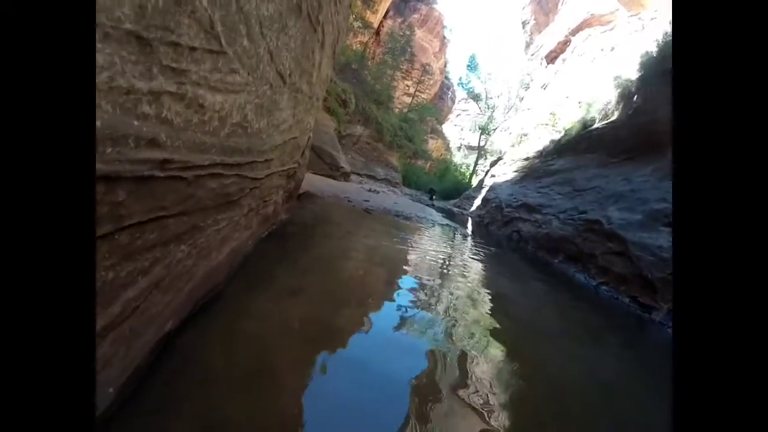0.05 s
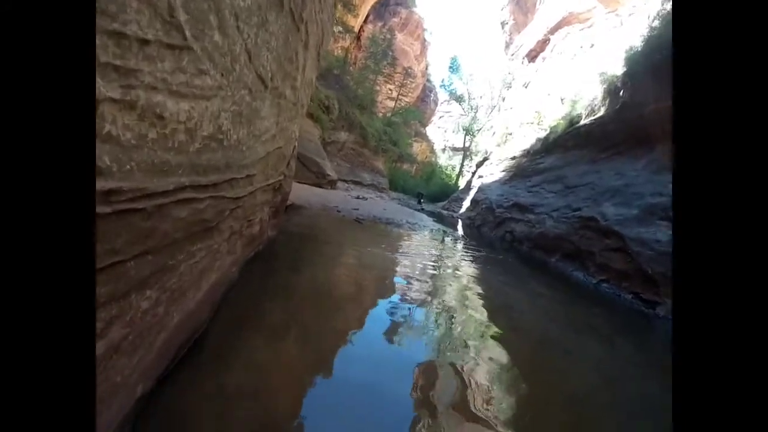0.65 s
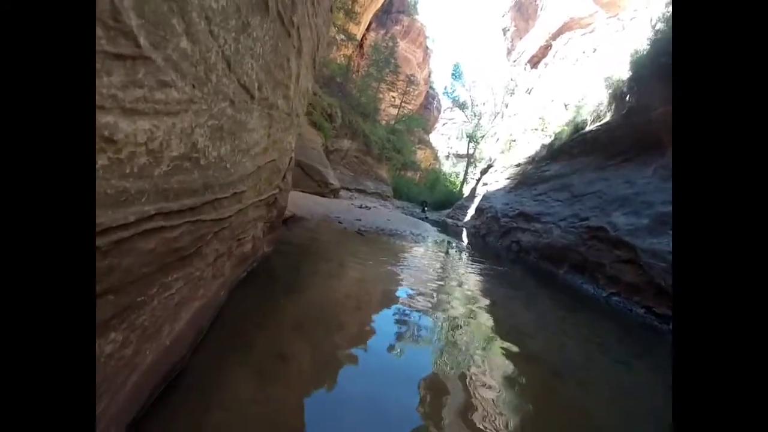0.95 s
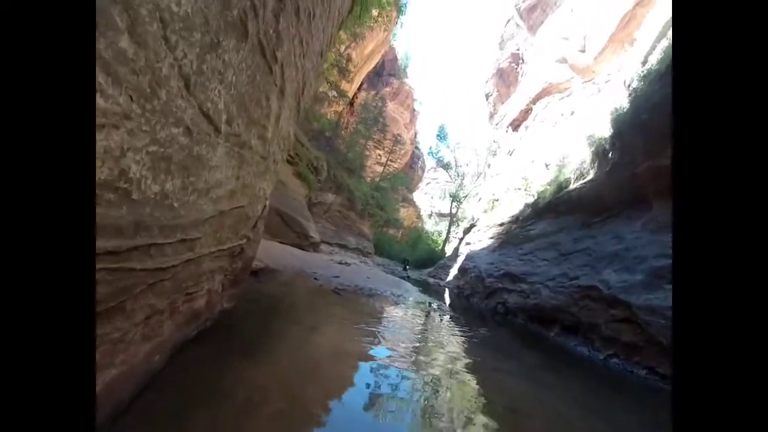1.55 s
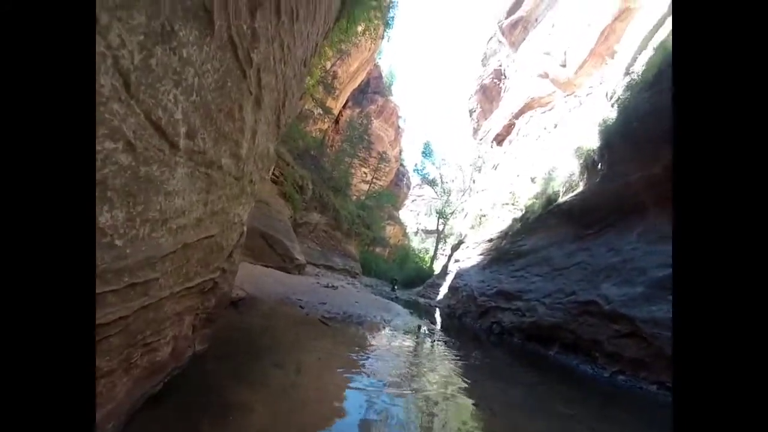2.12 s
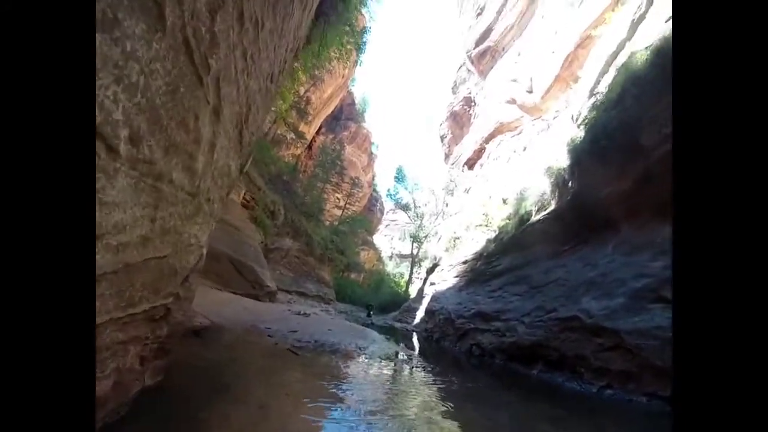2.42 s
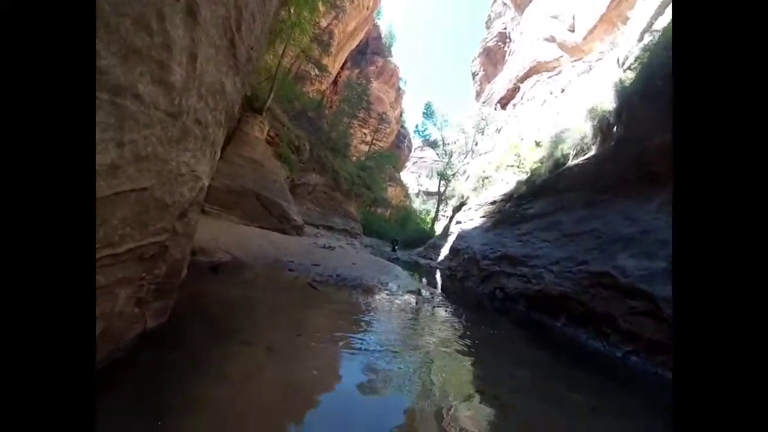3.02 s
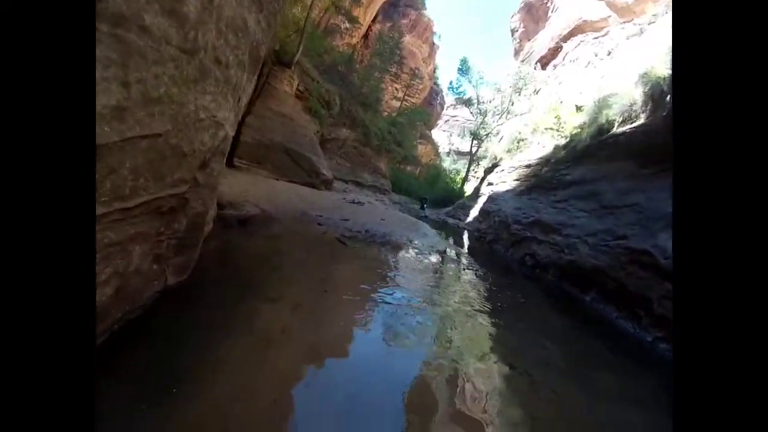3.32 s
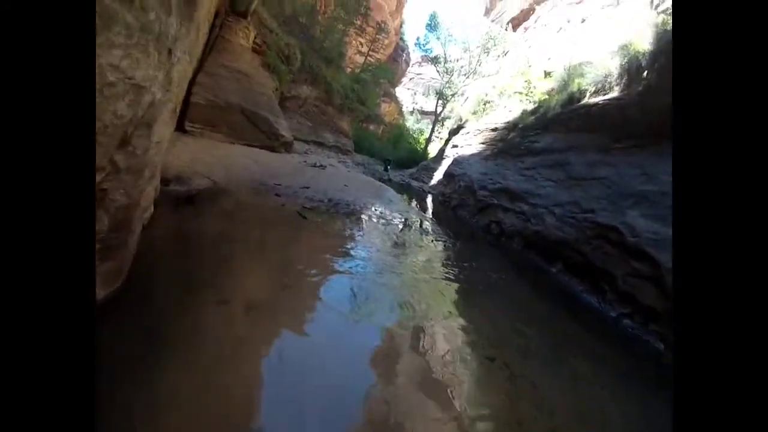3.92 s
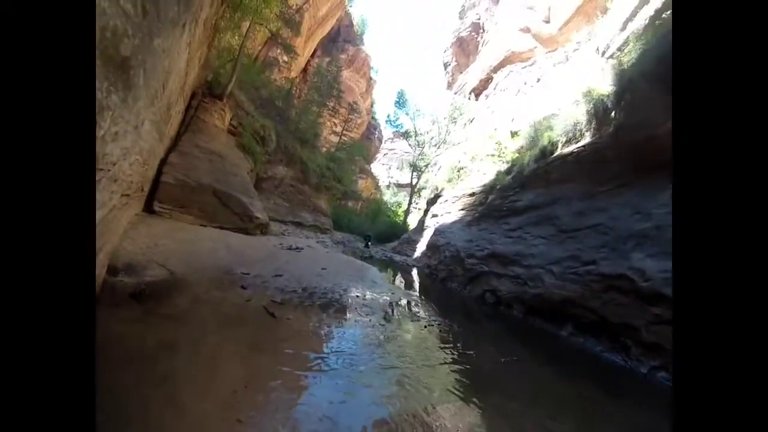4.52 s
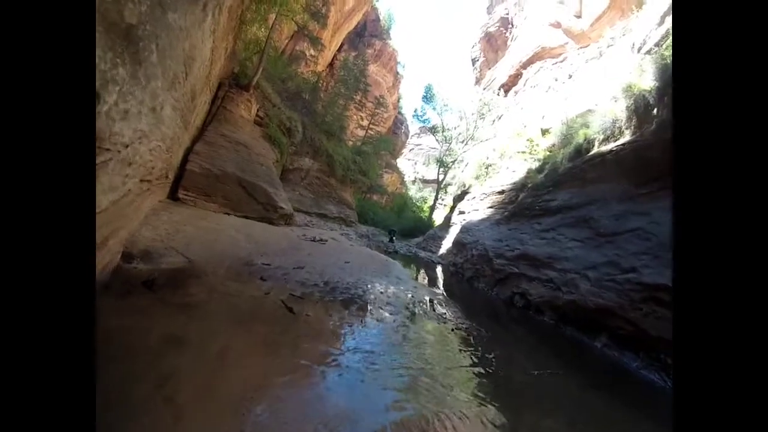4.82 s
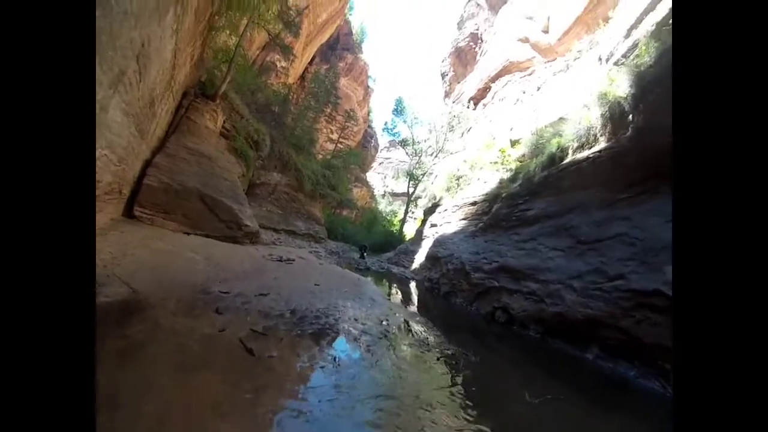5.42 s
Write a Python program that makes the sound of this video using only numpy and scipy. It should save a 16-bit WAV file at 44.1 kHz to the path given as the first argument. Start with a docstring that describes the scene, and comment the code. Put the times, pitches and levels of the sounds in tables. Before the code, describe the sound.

Water swishes softly and close by as someone moves through a narrow canyon pool. Slow strokes push up fine, fizzing bubbles at about 0.5, 1.5, 2.5 and 3.3 seconds, then shorter ones at 3.9, 4.6 and 5.4 seconds. Between them wavelets lap and pockets of air gurgle. Small slaps and ringing plops dot the surface, clearest around 0.4, 1.2, 1.8, 2.7, 4.2 and 4.9 seconds, each with a faint, short echo off the rock.

The microphone is held just above the water in a case that gives the splashing a hollow colour. It sways with a low rumble and jolts with deep, dull thumps near 0.4, 0.8 and 2.5 seconds. The loudest by far comes at 4.1 seconds, with a knock, a tiny creak and a momentary dip in level. Softer thumps follow at 4.8 and 5.5 seconds. A faint steady hiss lies underneath throughout.

```python
"""A narrow canyon pool: someone moves through it with slow strokes, a cased camera just above the water.
Each stroke pushes up a swish of fine bubbles, coloured by the hollow resonances of the case.
Small slaps and plops dot the surface and ring briefly off the rock walls.
The camera sways in the hand and jolts with low thumps; the hardest jolt creaks the case and trips
the limiter. A faint steady hiss lies underneath."""
import sys
import numpy as np
from scipy import signal
from scipy.fft import rfft, irfft, next_fast_len
from scipy.io import wavfile
from scipy.ndimage import map_coordinates

SR = 44100
rng = np.random.default_rng(int(sys.argv[2]) if len(sys.argv) > 2 else 0)


def generate_wav(sig):
    """Save sig (samples, or channels by samples) to the path in sys.argv[1] as 16-bit PCM at SR."""
    pcm = np.round(np.clip(np.atleast_2d(sig).T, -1, 1) * 32767).astype(np.int16)
    wavfile.write(sys.argv[1], SR, pcm)


N = 244755

# strokes: (time of full push [s], swish level [dB], rise [s], hold [s], fall [s], spray over swish [dB])
STROKES = [(.51, -57, 0.12, 0.19, 0.047, -4), (1.456, -53.5, .24, .15, 0.062, -3),
           (2.47, -55, 0.11, 0.16, 0.074, -4.5), (3.278, -53, 0.099, 0.041, 0.081, -7),
           (3.927, -56, 0.012, 0.053, 0.082, -4.5), (4.599, -54.5, 0.034, 0.017, 0.16, -3),
           (5.425, -57, 0.027, 0.07, .1, -3.5)]
# wavelets lapping: (crest time [s], swish level [dB])
LAPS = [(.12, -59.5), (.28, -61.5), (.64, -54), (.91, -58), (1.1, -58.5), (1.25, -59.5), (1.87, -60.5),
        (2.8, -61.5), (3.11, -55.5), (3.46, -55), (3.65, -62), (4.2, -56), (4.38, -58), (4.62, -53.5),
        (4.76, -60), (4.89, -58.5), (5.1, -62), (5.23, -62)]
# pockets of air gurgling up: (time [s], level [dB])
GURGLES = [(.48, -63), (.57, -60), (.69, -64), (1.36, -60.5), (1.48, -57), (2.15, -64), (2.32, -62),
           (2.5, -63), (2.92, -70), (3.3, -58.5), (4.11, -62), (4.19, -59), (4.35, -59), (4.8, -59.5),
           (4.89, -64.5)]
# slaps of water: (time [s], relative level [dB], fade [s], centre [Hz])
SLAPS = [(0.406, -48, 0.0022, 1460), (.4115, -42, 0.0025, 1420), (0.511, -49.5, 0.0069, 3550),
         (.721, -50, 0.0061, 1990), (1.845, -45.5, 0.01, 3280), (1.934, -53.5, 0.012, 2000),
         (2.013, -55.5, 0.0072, 3400), (2.7461, -38.5, 0.0017, 4300), (3.091, -48, 0.013, 1780),
         (3.3308, -41.5, 0.0024, 1210), (3.462, -47, 0.0041, 2200), (3.917, -43, 0.0056, 4000),
         (3.926, -43, 0.01, 4130), (4.081, -48, 0.014, 1810), (4.1822, -44, 0.0088, 2200),
         (4.2202, -42, 0.011, 1970), (4.862, -44.5, 0.0031, 2200), (4.876, -42, 0.0033, 2820),
         (4.894, -45, 0.0066, 2390), (5.010, -44.5, 0.0045, 3380), (5.390, -45, 0.009, 2530),
         (5.4603, -44.5, 0.0065, 1720)]
# single bubbles: (time [s], level [dB], pitch [Hz])
PLOPS = [(0.405, -37, 1444), (0.502, -48, 450), (0.897, -41, 1110), (1.1842, -35, 1600), (1.204, -38, 1550),
         (1.269, -43.5, 4270), (1.456, -49.5, 334), (1.836, -52, 706), (1.8467, -38, 2170),
         (1.948, -54, 626), (2.7463, -40.5, 3160), (3.295, -49, 284), (4.1815, -31.5, 1324),
         (4.183, -36, 1040), (4.332, -50.5, 450), (4.894, -50, 5000), (4.914, -46.5, 930),
         (5.01, -47, 5200), (5.135, -52, 368)]
# jolts of the camera: (time [s], level [dB], pitch [Hz], rise [s], fall [s])
JOLTS = [(.444, -13, 36.6, 0.011, 0.0055), (.752, -15.5, 27, 0.02, 0.014), (1.421, -30, 36.7, 0.034, 0.021),
         (1.65, -25.5, 33.2, 0.0056, 0.012), (2.085, -27, 35, 0.012, .023),
         (2.283, -25.5, 39.5, 0.031, 0.027), (2.549, -17.5, 31, 0.015, 0.024),
         (2.659, -22.5, 22, .015, .015), (3.351, -31.5, 30.2, 0.048, 0.09), (4.1136, .5, 33, 0.0089, .013),
         (4.2, -21, 22, .025, .025), (4.798, -10.5, 31, 0.011, 0.014), (5.458, -18, 39, 0.0097, 0.034)]
# rumble of the swaying hand: (time [s], relative level [dB])
SWAY = [(0.0, -40), (0.4, -42.5), (0.82, -39.5), (1.16, -48), (1.37, -47.5), (1.55, -39.5), (2.07, -46.5),
        (2.27, -37.5), (2.44, -37.5), (2.94, -47), (3.46, -41), (3.68, -47.5), (3.94, -48), (4.13, -41),
        (4.47, -48), (4.76, -38.5), (5.24, -47.5), (5.55, -38)]
# resonances of the camera case: (centre [Hz], width [Hz], boost [dB])
CASE_RESONANCES = [(1120, 145, 7.5), (1434, 265, 12.5), (1693, 170, 7.5), (2086, 320, 6.5),
                   (2407, 446, 15.5), (3505, 610, 6), (3858, 133, 9), (4200, 255, 7.5), (4447, 154, 10.5),
                   (5220, 110, 6), (5790, 300, 6.5), (6750, 680, 4.5), (7800, 560, 3)]
# decay off the rock walls: (frequency [Hz], reverb time [s])
WALL_DECAY = [(200, 0.18), (2000, 0.86), (10000, 0.45)]
# tone of each water layer: (frequency [Hz], gain [dB])
SWISH_EQ = [(200, -35), (600, -0.5), (1000, -3.5), (1900, 0.5), (2700, -5), (4000, -6), (8000, -32.5)]
SPRAY_EQ = [(1200, -27), (2300, -6), (2950, -2.5), (3400, -2), (5000, -2.5), (6500, -2), (8400, -6),
            (9200, -11.5), (11000, -17), (15000, -26)]
CHURN_EQ = [(80, -11.5), (180, -12.5), (400, -2), (700, 0.5), (1100, -1.5), (2500, -46)]
SLAP_EQ = [(150, -27), (500, 3.5), (1200, 2.5), (4000, -6.5), (7500, -2.5), (10000, -16.5), (15000, -16)]
# tone of the handling noises and the hiss: (frequency [Hz], gain [dB])
RUMBLE_EQ = [(6, -10.5), (14, -5), (26, 0), (38, 1), (50, -5), (70, -17), (100, -29.5), (160, -37.5),
             (300, -58), (1000, -100)]
SCUFF_EQ = [(60, -14), (140, -1), (300, -8.5), (800, -16.5), (1300, -13.5), (3000, -43.5)]
CREAK_EQ = [(200, 3), (1000, -2), (3000, 8), (9000, -1), (15000, -9)]
HISS_EQ = [(30, 4.5), (150, 17.5), (500, 9.5), (1500, 3.5), (4000, -3), (9000, -6), (15000, -10)]


def strokes():
    """Strokes and wavelets foam: big bubbles churn below, small ones swish and spray, drops fall back."""
    pushes = [amp(db) * swell(s, rise, fall, 0.0097, hold) for s, db, rise, hold, fall, _ in STROKES]
    push = together(pushes)
    thrown = together(amp(spray_db) * level for (*_, spray_db), level in zip(STROKES, pushes))
    lap = together(amp(db) * swell(s, rise=0.028, fall=0.069, shoulder=0.013) for s, db in LAPS)
    gurgle = together(amp(db) * swell(s, rise=0.028, fall=0.022, shoulder=0.033) for s, db in GURGLES)
    ripple = amp(0.83 * wobble(rate=7))  # the pool never settles
    surge = wobble(rate=45)  # fast flutter in the foam
    swish = froth(count=5000, centre_hz=1699, octaves=0.898, cycles=2.8, scatter_db=2, wash=1.9, size=600)
    spray = froth(count=4000, centre_hz=5490, octaves=1.073, cycles=3.4, scatter_db=2.5, wash=1.9, size=260)
    churn = froth(count=900, centre_hz=475.3, octaves=1.11, cycles=3.3, scatter_db=2.5, wash=2.6, size=2400)
    drops = froth(count=300, centre_hz=3400, octaves=1, cycles=2.5, scatter_db=3.5, wash=0.11, size=600)
    swish_level = together([push, lap, amp(-63.5) * ripple]) * amp(0.9 * surge)
    spray_level = together([thrown, amp(-7.5) * lap, amp(-69.5) * ripple]) * amp(1.65 * surge)
    churn_level = together([amp(-14) * push, gurgle, amp(-71.5) * ripple])
    drop_level = amp(-13) * together([push, lap])
    return (swish_level * through_case(swish, SWISH_EQ)
            + spray_level * through_case(spray, SPRAY_EQ)
            + churn_level * through_case(churn, CHURN_EQ)
            + drop_level * through_case(drops, SLAP_EQ))


def froth(count, centre_hz, octaves, cycles, scatter_db, wash, size):
    """A cloud of random bubbles, each size samples long, on a wash of ones too dense to pick out."""
    when, pitch, strength = rng.random((count, 3)).T[:, :, None]
    hz = np.minimum(centre_hz * 2 ** (octaves * (2 * pitch - 1)), SR / 3)
    t = np.arange(size) / SR
    gain = amp(-scatter_db * np.log(np.maximum(strength, np.exp(-4))))  # a few bubbles stand out
    grains = gain * bubble(t, hz, cycles / hz, glide=0.021)
    positions = (when * N).astype(int) + np.arange(size)
    cloud = np.bincount(positions.ravel(), grains.ravel(), N)[:N]
    return unit(unit(cloud) + wash * rng.standard_normal(N))


def bubble(t, hz, fade, glide):
    """A damped air bubble whose pitch climbs as it nears the surface."""
    ring = np.sin(2 * np.pi * hz * t * (1 + glide * t / fade))
    return ring * np.exp(-t / fade) * (1 - np.exp(-2 * hz * t))


def slaps():
    """Small sheets of water collapse in short noisy bursts, each with its own pitch."""
    out, t = np.zeros(N), np.arange(SR // 8) / SR
    for s, db, fade, centre_hz in SLAPS:
        envelope = np.exp(-t / fade) * (1 - np.exp(-t / 0.00026))
        hump_db = lambda hz: -12 * np.log10(1 + (np.log2((hz + 1) / centre_hz) / 0.68) ** 2)
        tone_db = lambda hz: hump_db(hz) + along(SLAP_EQ, hz) + case_boost(hz)
        burst = equalise(envelope * rng.standard_normal(len(t)), tone_db)
        burst *= np.linalg.norm(envelope) / np.linalg.norm(burst)
        add(out, s, amp(db + 0.5) * burst)
    return out


def plops():
    """Drops and closing hollows trap single ringing bubbles; smaller ones die sooner."""
    out, t = np.zeros(N), np.arange(SR // 8) / SR
    for s, db, hz in PLOPS:
        fade = 0.005 / (hz / 1000) ** 0.68
        add(out, s, amp(db) * bubble(t, hz, fade, glide=0.0213))
    return out


def handling():
    """The camera sways in the hand; each jolt swells into a low thump and dies, scuffing the grip."""
    t = np.arange(N) / SR
    out = amp(3.5 + np.interp(t, *np.transpose(SWAY))) * noise(RUMBLE_EQ)
    scuff = noise(SCUFF_EQ)
    for s, db, hz, rise, fall in JOLTS:
        shoulder = 0.018 * np.exp(-amp(db) / 0.36)  # gentle jolts are rounded, hard ones sharp
        envelope = swell(s, rise, fall, shoulder)
        out += amp(db) * envelope * np.sin(2 * np.pi * hz * (t - s))
        out += amp(db - 42) * envelope * scuff
    return out


def case_flex():
    """Under the hardest jolt the case creaks once and its wall gives with one dull push."""
    t = np.arange(N) / SR
    blip = lambda s, half_width: np.exp(-((t - s) / half_width) ** 2)
    creak = amp(-39.5) * blip(4.1095, half_width=0.003) * noise(CREAK_EQ)
    knock = amp(-13.5) * blip(4.1075, half_width=0.0028)
    return creak - knock


def case_boost(hz):
    """Gain in dB that the hollow case's resonances give to sound from outside."""
    return sum(db * 0.5 ** ((2 * (hz - centre) / width) ** 2) for centre, width, db in CASE_RESONANCES)


def through_case(x, eq):
    """A layer shaped by its own EQ and by the case, at rms 1."""
    return unit(equalise(x, lambda hz: along(eq, hz) + case_boost(hz)))


def canyon(x):
    """The rock walls answer after 10 ms with a short diffuse tail."""
    hz, t, bands = signal.stft(rng.standard_normal(SR // 2), SR, nperseg=256)
    decay = amp(-60 * t / along(WALL_DECAY, hz)[:, None])
    tail = signal.istft(bands * decay, SR, nperseg=256)[1]
    delayed = np.pad(x, (SR // 100, 0))
    return signal.fftconvolve(delayed, tail / np.linalg.norm(tail))[:N]


def noise(eq):
    """A steady noise bed shaped by an EQ, at rms 1."""
    return unit(equalise(rng.standard_normal(N), lambda hz: along(eq, hz)))


def swell(s, rise, fall, shoulder, hold=0):
    """An envelope that grows to 1 at time s, holds and dies away; shoulder [s] rounds its corners."""
    t = np.arange(N) / SR - s
    outside = t - np.clip(t, 0, hold)
    return np.exp(-(np.hypot(outside, shoulder) - shoulder) / np.where(t < 0, rise, fall))


def wobble(rate):
    """A smooth random curve with rate knots a second."""
    return map_coordinates(rng.standard_normal(int(N * rate / SR) + 4), [np.arange(N) * rate / SR])


def equalise(x, db_at):
    """Minimum-phase EQ with a gain in dB at each frequency."""
    size = 2 * next_fast_len(len(x) // 2 + SR // 8)
    gain = amp(db_at(np.fft.rfftfreq(size, 1 / SR)))
    cepstrum = irfft(np.log(gain + 1e-6), size)
    cepstrum[1:size // 2] *= 2
    cepstrum[size // 2 + 1:] = 0
    return irfft(rfft(x, size) * np.exp(rfft(cepstrum)), size)[:len(x)]


def along(points, hz):
    """Read a curve of (frequency [Hz], value) points on a log axis."""
    frequencies, values = np.transpose(points)
    return np.interp(np.log(hz + 1), np.log(frequencies), values)


def add(track, s, sound):
    """Mix a sound into a track from time s on."""
    start = max(round(s * SR), 0)
    track[start:start + len(sound)] += sound[:len(track) - start]


def together(levels):
    """Joint level of unrelated sounds: their powers add."""
    return np.sqrt(sum(level ** 2 for level in levels))


def amp(db):
    return 10 ** (np.asarray(db) / 20)


def unit(x):
    return x / np.sqrt(np.mean(x ** 2) + 1e-20)


def limiter(x):
    """Gain ducks quickly on a loud swing, then creeps back."""
    ceiling, attack_s, release_db_per_s = 0.3, 0.002, 120
    over_db = 20 * np.log10(np.maximum(np.abs(x) / ceiling, 1))
    regained_db = release_db_per_s * np.arange(N) / SR
    cut_db = np.maximum.accumulate(over_db + regained_db) - regained_db
    lag = np.exp(-1 / (attack_s * SR))
    return x * amp(-signal.lfilter([1 - lag], [1, -lag], cut_db))


def scene():
    """Close water, the splashes' echo off the rock, camera handling and a bed of hiss, in mono."""
    splashes = slaps() + plops()
    water = strokes() + splashes + amp(-14) * canyon(splashes)
    return (water + handling() + case_flex() + amp(-63.5) * noise(HISS_EQ))[None]


def record(dry):
    """The camera limits loud swings and cuts off the very top of the treble."""
    size = next_fast_len(N + SR // 2)
    passband = np.fft.rfftfreq(size, 1 / SR) < 15350
    return irfft(rfft(limiter(dry[0]), size) * passband, size)[None, :N]


dry = scene()
out = record(dry)
generate_wav(out)
```